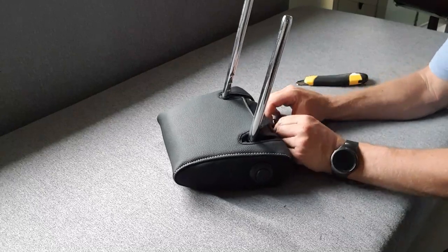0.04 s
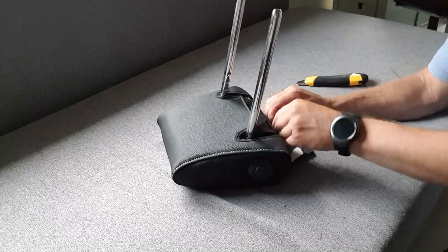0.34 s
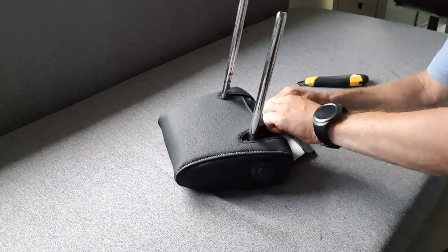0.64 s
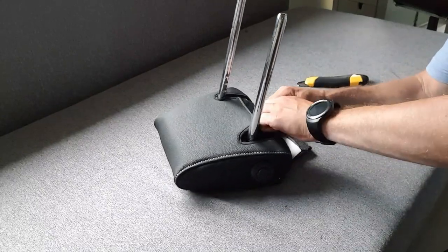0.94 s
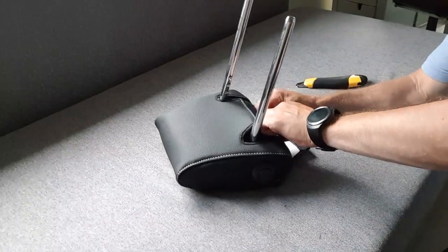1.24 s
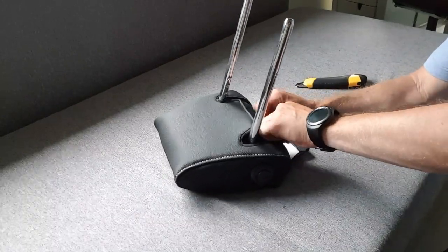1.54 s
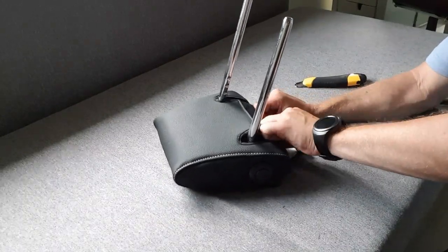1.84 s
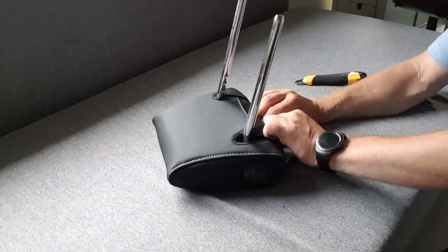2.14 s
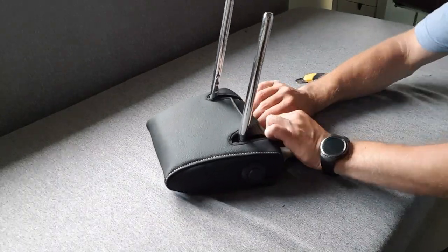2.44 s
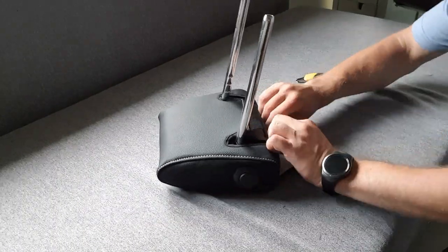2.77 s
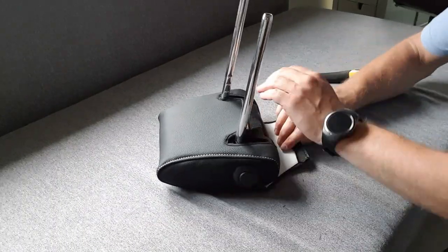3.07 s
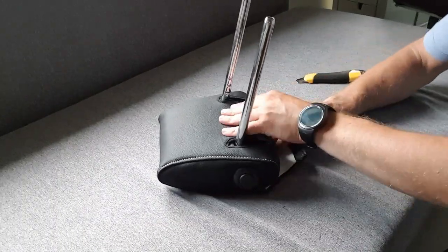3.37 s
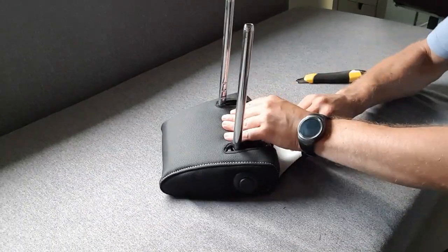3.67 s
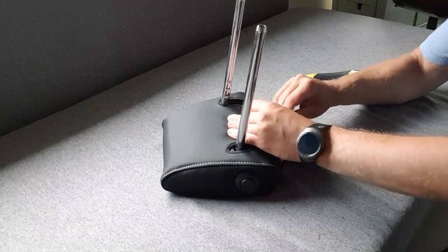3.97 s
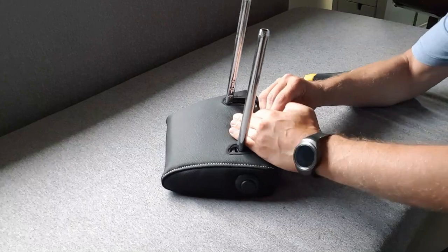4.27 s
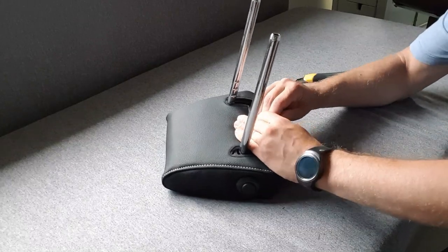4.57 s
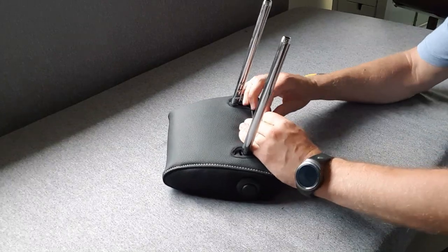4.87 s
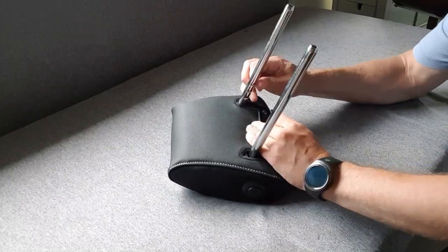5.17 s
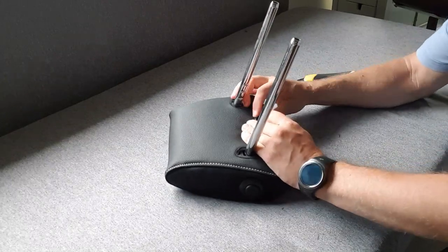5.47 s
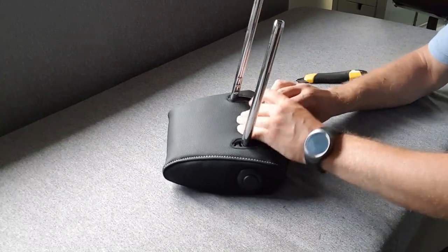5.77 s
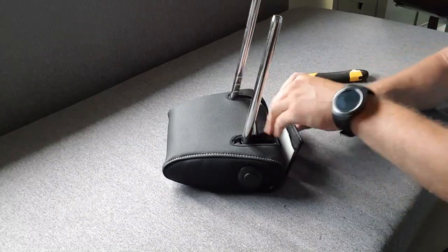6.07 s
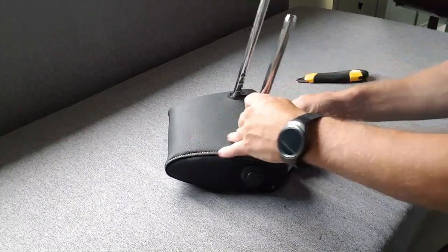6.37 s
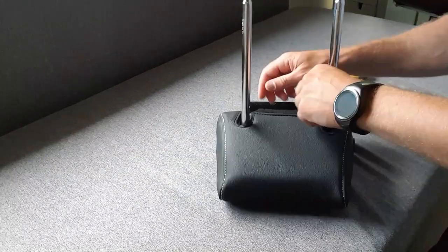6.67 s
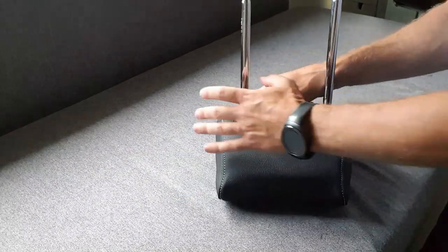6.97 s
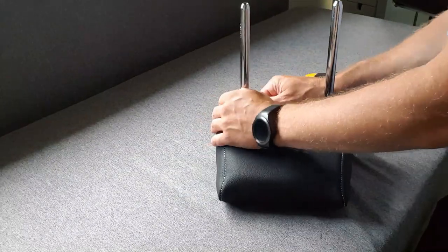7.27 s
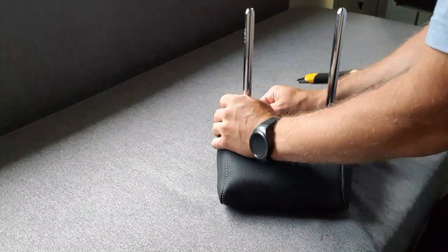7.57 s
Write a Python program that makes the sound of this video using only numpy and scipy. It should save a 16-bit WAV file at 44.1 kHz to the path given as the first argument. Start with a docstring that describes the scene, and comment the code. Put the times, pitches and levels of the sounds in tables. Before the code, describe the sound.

Hands work a fitted cloth cover over a car headrest, close to a stereo microphone in a small room, louder on the left. It opens with short rustles and crisp hem snaps. From about 0.6 to 0.8 seconds a hook-and-loop flap rips open, building to the loudest moment and ending in a hollow pop, with a faint, thin ring from the steel posts. Much quieter, uneven rubbing follows, with tiny ticks and brief creaks of taut cloth. A plastic edge strip clicks near 1.1, 2.7 and 5 seconds, and the padded body bumps dully around 1.2, 5 and 6 seconds. The handling almost stops between 3.1 and 3.6 seconds, then resumes as light, fizzy scrapes. A rub swells around 6.5 seconds, and a few soft strokes and knocks run from 7 to 7.8 seconds. Faint room air, low mains hum and table rumble continue throughout.

```python
"""A fitted cloth cover, pulled tight by two hands over a car headrest, rubs in countless tiny slips.
It lies on a cloth-covered table in a small room, near a stereo microphone and louder on the left.
The stiff hem snaps, taut cloth groans, a plastic edge strip clicks, and early on a hook-and-loop
flap tears open, faintly ringing the steel posts. The padded body bumps dully.
Under it all lie room air, a low mains hum and the rumble of the table."""
import sys
import numpy as np
from scipy import signal
from scipy.fft import rfft, irfft
from scipy.io import wavfile
from scipy.ndimage import uniform_filter1d

SR = 44100
rng = np.random.default_rng(int(sys.argv[2]) if len(sys.argv) > 2 else 0)


def bounce(signal):
    """Save signal as a 16-bit WAV file at the path given by the first command-line argument."""
    frames = np.transpose(np.atleast_2d(signal))
    limited = np.clip(frames, -1, 1)
    pcm = np.round(limited * 32767).astype(np.int16)
    wavfile.write(sys.argv[1], SR, pcm)


N = 344421


def amp(db):
    """Decibels as a gain."""
    return 10 ** (np.asarray(db) / 20)


def unit(x):
    """The signal scaled to an RMS of 1."""
    return x / np.sqrt(np.mean(x ** 2) + 1e-20)


def spectrum_at(points, hz):
    """A spectrum joined by straight lines on a log-frequency axis."""
    f, value = np.transpose(points)
    return np.interp(np.log(hz + 1), np.log(f + 1), value)


def fader(points):
    """Rows of t/s, level/dB as a gain for every sample."""
    times, levels_db = np.transpose(points)
    return amp(np.interp(np.arange(N) / SR, times, levels_db))


def wander(db, per_s):
    """A gain that drifts by about db, reaching a new random value per_s times a second."""
    knots = rng.standard_normal(400)
    return amp(db * np.interp(np.arange(N) / SR * per_s, np.arange(len(knots)), knots))


def add(mix, start_s, sound):
    """Mix a sound in from start_s on."""
    part = mix[max(round(start_s * SR), 0):][:len(sound)]
    part += sound[:len(part)]


def causal_pulse(shape, size=2048):
    """The shortest causal pulse whose spectrum in dB is shape(Hz)."""
    hz = abs(np.fft.fftfreq(size, 1 / SR))
    log_gain = np.log(amp(np.maximum(shape(hz), -90)))
    return np.fft.ifft(np.exp(np.conj(signal.hilbert(log_gain)))).real[:size // 2]


def colour(x, points):
    """Filter by rows of f/Hz, level/dB."""
    return signal.oaconvolve(x, causal_pulse(lambda hz: spectrum_at(points, hz)))[:N]


def resonate(x, hz, width_hz):
    """A resonance of gain 1 at a fixed or moving pitch."""
    turn = np.exp(2j * np.pi * np.cumsum(hz * np.ones(len(x))) / SR)
    pole = np.exp(-np.pi * width_hz / SR)
    return 2 * (turn * signal.lfilter([1 - pole], [1, -pole], x / turn + 1e-18)).real


def slips(per_s, spread_db, clump_db):
    """Tiny slips of uneven size that come in clumps a few milliseconds long."""
    size = amp(spread_db * np.minimum(rng.exponential(1, N), 4)) * rng.choice([-1, 1], N)
    clumps = amp(clump_db * unit(uniform_filter1d(rng.standard_normal(N), 300)))
    return size * clumps * (rng.random(N) < per_s / SR)


def friction(points, per_s, spread_db, clump_db, uneven_db, folds=4):
    """Slips land on several folds of cloth, each with its own colour; the load wanders among them."""
    out, hz = np.zeros(N), np.geomspace(100, 16000, 40)
    knots = np.arange(0, N, SR // 25)
    for _ in range(folds):
        fold_db = spectrum_at(points, hz) + uneven_db * rng.standard_normal(len(hz))
        load = np.interp(np.arange(N), knots, rng.uniform(0.13, 1, len(knots)))
        slipping = slips(per_s / folds, spread_db, clump_db)
        out += load * unit(colour(slipping, np.transpose([hz, fold_db])))
    return unit(out)


# Hand strokes over the cover: t/s, length/s, attack/s, rub level/dB,
# drag/dB re rub, fizz/dB re rub, swell from start to end/dB
STROKES = [(0, 0.08, 0.0026, -57, -3.5, -0.5, -8), (0.141, 0.074, .01, -56, -9, 0, 0),
           (0.242, .04, 0.009, -61.5, -6.5, 2, -2), (.3, 0.025, 0.013, -48.5, -8, 5.5, -3.5),
           (0.323, 0.17, .01, -67.5, -4.5, 2.5, 7), (0.515, 0.088, 0.013, -56, -5.5, 0, -13),
           (.595, .17, .02, -56.5, 2, 10.5, 5), (0.863, 0.33, .03, -80, 8, 6.5, -5),
           (1.091, 0.083, 0.018, -56, -4, -6.5, 7), (1.174, 0.1, 0.0082, -55, -2.5, 0, -10),
           (1.397, .09, .015, -77, -11, 8.5, 0), (1.49, 0.1, 0.023, -63, -5.5, -4.5, -6),
           (1.655, 0.25, 0.052, -73, 8.5, 3.5, -3.5), (1.933, 0.07, 0.024, -66, 1, -2, 9.5),
           (2.009, 0.25, 0.012, -70, -2, 4.5, 0), (2.254, 0.12, 0.06, -54.5, -3.5, -8.5, -5),
           (2.405, .11, 0.028, -56, -9.5, -5.5, -9), (2.524, .15, .01, -74.5, -8, 3, 9),
           (2.695, 0.072, 0.019, -57.5, -9, -4, -7), (2.852, .05, 0.035, -55.5, -7.5, -0.5, -1),
           (2.994, 0.085, 0.011, -68.5, 2, -2.5, -5), (3.58, .15, 0.043, -66, -5.5, 0.5, 2),
           (3.775, 0.089, .008, -74.5, 3.5, 9.5, -7), (3.878, 0.082, 0.038, -72, 2, 14.5, -1),
           (4.018, 0.082, 0.048, -67.5, 3, 5, -5), (4.13, 0.21, .03, -88.5, 14, 13, 0),
           (4.309, 0.15, 0.019, -76.5, 6, 4, -10), (4.554, 0.04, 0.016, -82, 17, -9, -6),
           (4.69, 0.068, 0.011, -81.5, 0, 18.5, -1), (4.749, 0.077, 0.019, -61, 1, -2.5, 2.5),
           (4.982, 0.067, 0.026, -60.5, -22, 3, 0), (5.062, .08, 0.019, -65, -24, -5, -8),
           (5.159, 0.052, 0.0099, -55, 1, -3.5, -5), (5.225, 0.088, 0.018, -73.5, 11.5, 5.5, -2),
           (5.521, 0.19, .025, -70.5, -6, -1.5, 5), (5.736, 0.079, 0.0068, -55, -5.5, -2, -9),
           (5.82, .1, .02, -71, 0, 2, 2), (5.972, 0.09, .01, -65, 0.5, -1, -2),
           (6.303, 0.081, .01, -90.5, 11, 5, 0), (6.405, 0.25, 0.015, -68.5, 1.5, -5, 15),
           (6.548, 0.1, 0.047, -54.5, -9.5, -2.5, -10), (6.731, 0.087, .008, -65, -4.5, -1, -17.5),
           (7.184, 0.16, 0.0079, -71, -3.5, 1, -10.5), (7.318, 0.047, 0.048, -57.5, -3, 5.5, -1),
           (7.501, 0.18, 0.013, -69, 0.5, 5, 1), (7.676, 0.12, .02, -77, 8.5, 6, 5)]


def stroking(grip_db=-91, release_s=0.022):
    """Gains of rub, drag and fizz: strokes take hold, swell or ease, and let go over a restless grip."""
    t = np.arange(N) / SR
    grip = amp(grip_db + np.array([[0], [13], [2]]))  # rub, drag, fizz
    power = (grip * wander(db=4.5, per_s=6)) ** 2
    for start_s, length_s, attack_s, db, drag_db, fizz_db, swell_db in STROKES:
        age = t[:int((length_s + release_s) * SR)]
        gate = np.minimum(age / attack_s, 1) * np.clip(1 - (age - length_s) / release_s, 0, 1)
        stroke = gate * amp(db + swell_db * (np.minimum(age / length_s, 1) - 0.5))
        for layer, layer_db in zip(power, (0, drag_db, fizz_db)):
            add(layer, start_s, (amp(layer_db) * stroke) ** 2)
    return np.sqrt(power)


# Spectra of the sliding cloth, right at the cover: f/Hz, level/dB
DRAG_COLOUR = [(50, -20.5), (140, -0.5), (250, 1), (420, -4), (700, -14), (2000, -72.5)]
RUB_COLOUR = [(200, -30), (450, -4), (650, 0), (1000, -1), (1900, -3), (3000, -13), (6000, -32),
              (12000, -60)]
SOFT_FIZZ_COLOUR = [(800, -30), (1700, 0), (2900, -1), (5000, -4), (7000, -8), (10000, -19), (16000, -20)]
BRIGHT_FIZZ_COLOUR = [(800, -13), (1900, -26.5), (2900, 2.5), (5000, 6), (7000, 2), (10000, -7),
                      (16000, -2.5)]


def cloth_rubbing(sharp_midpoint_db=-2.0, sharp_span_db=7.0):
    """Cloth slides on the padding: a low drag, a mid rub and the fizz of single fibres."""
    rub_gain, drag_gain, fizz_gain = stroking()
    drag = friction(DRAG_COLOUR, per_s=900, spread_db=3, clump_db=1.5, uneven_db=5)
    rub = friction(RUB_COLOUR, per_s=3000, spread_db=2, clump_db=3.5, uneven_db=0.4)
    soft = friction(SOFT_FIZZ_COLOUR, per_s=7000, spread_db=5, clump_db=2.7, uneven_db=1.5)
    bright = friction(BRIGHT_FIZZ_COLOUR, per_s=4000, spread_db=3.5, clump_db=1, uneven_db=2.5)
    crackle = friction(BRIGHT_FIZZ_COLOUR, per_s=220, spread_db=4, clump_db=1, uneven_db=4)
    # a flat palm gives a dull fizz; a nail or an edge a bright one, with single fibres catching
    fizz_re_rub_db = 20 * np.log10(fizz_gain / rub_gain)
    sharp = 0.5 + 0.5 * np.tanh((fizz_re_rub_db - sharp_midpoint_db) / sharp_span_db)
    fizz = np.sqrt(1 - sharp) * soft + np.sqrt(sharp) * (bright + amp(-5) * crackle)
    return amp(1.5) * drag_gain * drag + amp(-0.62) * rub_gain * rub + amp(-1.2) * fizz_gain * fizz


# Hollow modes of the headrest's shell: f/Hz, width/Hz, level/dB
SHELL_MODES = [(573, 23, 6.5), (840, 240, -13.5), (1140, 14, -12), (2350, 16, -46)]


def shell_ringing(cloth):
    """The cloth's sounds excite the hollow of the padded shell."""
    return sum(amp(db) * resonate(cloth, hz, width_hz) for hz, width_hz, db in SHELL_MODES)


# Likeness of the background at the two sides of the microphone: f/Hz, correlation/ratio
NOISE_LIKENESS = [(50, 0.95), (200, 0.016), (1000, 0), (4000, .1), (16000, 0.71)]


def stereo_noise(points):
    """Coloured noise, alike left and right in the deep bass and top treble, unrelated between."""
    hz = np.fft.rfftfreq(N, 1 / SR)
    left, other = rfft(rng.standard_normal((2, N)))
    same = spectrum_at(NOISE_LIKENESS, hz)
    right = same * left + np.sqrt(1 - same ** 2) * other
    return unit(irfft(np.array([left, right]) * amp(spectrum_at(points, hz)), N))


# Steady room air and hiss at the microphone: f/Hz, level/dB
AIR_COLOUR = [(20, -48.5), (35, -14.5), (52, 13.5), (70, 4.5), (100, 5), (135, -6.5), (200, -14),
              (400, -16.5), (800, -34), (2000, -27.5), (4000, -21), (6500, -26), (8500, -40), (11000, -22),
              (14000, -21), (16000, -22)]
# Slow course of the table's rumble under the arms: t/s, level/dB
RUMBLE_LEVEL = [(0, -57), (.12, -51.5), (.35, -64), (.78, -51.5), (.95, -65), (1.12, -53), (1.4, -65.5),
                (2.1, -58), (2.65, -68), (3.1, -60.5), (3.7, -66.5), (4.599, -65), (5.201, -66),
                (5.85, -63.5), (6.15, -68), (6.82, -57), (7.2, -65), (7.81, -68)]


def room_tone(hum_hz=99.2):
    """Room air and microphone hiss, a mains hum, and the table rumbling under the arms."""
    hum = np.sqrt(2) * np.sin(2 * np.pi * hum_hz * np.arange(N) / SR)
    low_noise = stereo_noise([(20, -39), (32, -10), (46, -7), (60, 0.5), (78, -9), (105, -12),
                              (160, -19), (400, -81)])
    rumble = fader(RUMBLE_LEVEL) * wander(db=0.5, per_s=6.5) * low_noise
    air = stereo_noise(AIR_COLOUR)
    return (amp(-68) * air + amp(-69) * hum + rumble) * amp([[3], [-5]])  # left, right


def hem_ticks(per_s=14, octaves=2.7, flutter_s=0.002, ring_hz=5200):
    """The hem ticks faintly at random moments within the strokes; returns rows like those of SNAPS."""
    wait, size, pitch = rng.random((200, 3)).T
    times = np.cumsum(-np.log(1 - wait)) / per_s
    levels_db = -63 + 0.5 * (1 - 2 * size)
    centres_hz = 3300 * 2 ** (2 * pitch - 1)
    return [(s, db, hz, octaves, flutter_s, ring_hz) for s, db, hz in zip(times, levels_db, centres_hz)
            if any(0 < s - start_s < length_s for start_s, length_s, *_ in STROKES)]


# Hem, fingernails and fastener hooks letting go:
# t/s, level/dB, centre f/Hz, spread/octaves, flutter decay/s, ring of the fold f/Hz
SNAPS = [(0.0432, -51.5, 850, 2.3, 0.0019, 4000), (0.099, -52, 1130, 1.6, .0015, 6400),
         (0.1561, -49.5, 770, 1.4, .0039, 5600), (0.2066, -55, 700, 1.7, 0.0018, 1800),
         (0.2566, -43, 2640, 1.7, 0.0012, 5830), (.2627, -50, 3500, 1.9, 0.0012, 3950),
         (0.295, -43.5, 2650, 2.1, 0.0016, 2860), (0.2996, -43.5, 2650, 1.3, .0006, 3000),
         (0.311, -39, 2120, 0.57, 0.00082, 5630), (.3227, -44, 2670, 1.9, 0.0031, 5540),
         (0.4049, -46, 1650, 1.1, 0.0011, 2500), (.4345, -44.5, 2630, 2.4, 0.002, 5540),
         (.5224, -47, 1650, 2.7, .0026, 6600), (0.5327, -42, 2900, 2.8, 0.0013, 7000),
         (0.5823, -39, 1400, 1.9, 0.00094, 1860), (0.5974, -36.5, 5100, 2.1, 0.0014, 6300),
         (0.6135, -35.5, 2880, 2.4, 0.0028, 3500), (0.6383, -31.5, 1100, 2.3, .0014, 1700),
         (.6534, -35, 2000, 2.3, .0039, 3700), (.6652, -31.5, 690, 1.38, 0.0012, 5200),
         (.708, -30, 1000, 2.6, .0077, 1900), (0.7363, -24.5, 1800, 1.9, 0.0092, 6260),
         (0.7411, -25.5, 2180, 1.02, 0.0068, 6200), (0.7546, -23, 1000, 2, 0.0067, 6600),
         (0.7578, -32, 700, 1.8, 0.0017, 5900), (.9535, -53.5, 3200, 1.2, 0.002, 2500),
         (1.1001, -47, 1500, 1.77, 0.0023, 4900), (1.429, -62.5, 2000, 1.2, 0.0018, 5900),
         (1.5318, -55.5, 1100, 1.57, 0.001, 1640), (1.7622, -55.5, 1810, 2.8, 0.0063, 4830),
         (1.815, -60, 1654, 2.1, 0.001, 5200), (1.8774, -56, 1800, 2.8, .0017, 1596),
         (1.9394, -56.5, 1000, 0.72, .003, 1150), (2.0425, -51.5, 4500, 0.72, 0.00047, 5200),
         (2.0572, -53.5, 3600, 1.1, 0.0013, 5200), (2.129, -53.5, 4250, 1.9, .0013, 5900),
         (2.5262, -50.5, 3620, 1.3, 0.0012, 5060), (2.543, -51.5, 3500, 2.5, .001, 5000),
         (2.6374, -52.5, 3880, 1.5, 0.00093, 5000), (2.6962, -39, 2610, 2.5, 0.0015, 4800),
         (2.777, -47, 1100, 2.1, 0.0015, 1710), (3.202, -65.5, 800, 1.8, .002, 950),
         (3.6519, -54, 1130, 1.2, .0017, 2000), (3.782, -51, 2400, 1.17, .0018, 5000),
         (3.8433, -55, 9000, 1.8, .0007, 6750), (4.053, -57, 2470, 2.5, 0.0012, 3900),
         (4.2813, -46, 9930, 2.3, .0007, 10500), (4.393, -63, 1200, 1.6, 0.0016, 4870),
         (4.762, -51, 697, 1.97, .0013, 5000), (4.7961, -45, 3150, 1.12, 0.0022, 4850),
         (4.997, -39, 2000, 3.3, 0.0012, 5440), (5.0387, -44.5, 1650, 1.3, 0.0014, 3200),
         (5.1657, -48, 930, 2.3, 0.0043, 5500), (5.2746, -53.5, 756, 2.1, 0.0039, 1160),
         (5.5546, -56.5, 1250, 1.25, 0.0016, 1700), (5.6551, -57, 2600, 1.4, .0054, 3210),
         (5.752, -49, 930, 2.1, 0.00078, 1010), (5.9385, -57.5, 4720, 1.2, 0.0029, 6200),
         (5.97, -44, 797, 2.6, 0.0015, 4150), (6.014, -52.5, 1500, 2.4, 0.0022, 5200),
         (6.0332, -47, 3200, 1.9, 0.0016, 7200), (6.3216, -63, 4250, 1.36, 0.0016, 6900),
         (6.651, -54, 840, 1.03, .0016, 2000), (7.5229, -54.5, 2170, 0.81, 0.0031, 5800),
         (7.5772, -50.5, 700, 1.35, .0025, 1600), (7.6274, -43, 704, 2, 0.0014, 785),
         (7.7564, -56, 3220, 0.43, 0.00052, 3700)]


def snapping(release=3.0, ring_db=-3, ring_cycles=1.22, gain_db=1.0):
    """Each snap is a release and a brief flutter of slips; the taut fold rings for a cycle or two."""
    out, t = np.zeros(N), np.arange(512) / SR
    events = SNAPS + hem_ticks()
    noises = rng.standard_normal((300, len(t)))
    for (start_s, db, centre_hz, octaves, flutter_s, ring_hz), noise in zip(events, noises):
        flutter = release * (t == 0) + noise * np.exp(-t / flutter_s)
        pulse = causal_pulse(lambda hz: -10 / np.log(10) * (np.log2((hz + 1) / centre_hz) / octaves) ** 2)
        crack = unit(np.convolve(flutter, pulse))
        fold = np.cos(2 * np.pi * ring_hz * t) * np.exp(-t * ring_hz / ring_cycles)
        snap = crack + amp(ring_db) * unit(np.convolve(crack, fold)[:len(crack)])
        snap *= np.sqrt(0.004 * SR) / np.linalg.norm(snap)  # the energy of 4 ms at an RMS of 1
        add(out, start_s, amp(db + gain_db) * snap)
    return out


# Bumps on the padded body and hollow pops of the taut cover: t/s, level/dB, f/Hz
BUMPS = [(.164, -47, 186), (.666, -35, 533), (.757, -18.5, 574), (.762, -31, 213), (1.101, -36, 600),
         (1.186, -36.5, 544), (1.25, -37.5, 957), (2.003, -47, 229), (2.647, -46, 576), (3.619, -48.5, 227),
         (3.649, -47, 188), (3.687, -43, 230), (3.781, -47, 280), (4.334, -47.5, 458), (4.762, -41.5, 485),
         (4.996, -33, 1080), (5.038, -35, 1520), (5.166, -45, 188), (5.199, -52, 210), (5.741, -42.5, 564),
         (5.79, -42, 567), (5.97, -33.5, 544), (6.02, -40.5, 473), (6.43, -43, 254), (6.812, -49.5, 235),
         (7.066, -42.5, 585), (7.627, -41, 550), (7.715, -44.5, 575)]


def body_bumping(overtone_ratio=1.506, overtone_db=-8, rise_s=0.00093):
    """A knuckle, a palm or a released fold sets the padded body swinging for a few cycles."""
    out, t = np.zeros(N), np.arange(SR // 5) / SR
    for start_s, db, hz in BUMPS:
        t60_s = 0.033 * (hz / 550) ** -0.67  # higher swings die sooner
        phase = 2 * np.pi * hz * t
        swing = np.sin(phase) + amp(overtone_db) * np.sin(overtone_ratio * phase)
        envelope = amp(-60 * t / t60_s) * (1 - np.exp(-t / rise_s))
        add(out, start_s, amp(db) * swing * envelope)
    return out


# Course of the tear along the flap: t/s, level/dB
PEEL_LEVEL = [(.58, -61), (.622, -41.5), (.672, -38.5), (.688, -45), (.712, -31), (.728, -57), (.741, -25),
              (0.763, -27.5), (.79, -73)]
# Spectrum of the tearing hooks, right at the flap: f/Hz, level/dB
PEEL_COLOUR = [(60, -48), (200, 8.5), (400, -17), (600, -3), (1000, 9.5), (1900, 5.5), (3000, -3),
               (5000, -1), (6500, -5), (10000, -4), (16000, 0.5)]


def flap_peeling():
    """Hooks tear from their loops in ragged rows, harder and harder until the flap comes free."""
    hooks = friction(PEEL_COLOUR, per_s=2200, spread_db=3.6, clump_db=3.4, uneven_db=1.2)
    return amp(-1.5) * fader(PEEL_LEVEL) * hooks


# Modes of the headrest's steel posts: f/Hz, width/Hz, level/dB
POST_MODES = [(4557, 10, 3), (6023, 9, 13), (6497, 12, 1), (8298, 8, 12)]


def posts_ringing(tear):
    """Only the hard tug on the flap shakes the steel posts into a thin, high ring."""
    return sum(amp(db) * resonate(tear, hz, width_hz) for hz, width_hz, db in POST_MODES)


# Groans and rasps of the taut cover, and two low, dull thumps:
# t/s, length/s, level/dB, start f/Hz, end f/Hz, width/Hz
GROANS = [(0.758, .04, -48, 247, 218, 130), (2.302, 0.076, -58.5, 800, 771, 450),
          (3.001, 0.14, -66, 615, 750, 200), (3.704, 0.033, -57.5, 1080, 860, 260),
          (3.886, 0.054, -55.5, 260, 345, 80), (4.056, 0.057, -62.5, 895, 1040, 300),
          (4.35, 0.098, -67, 500, 600, 159), (5.16, 0.039, -51, 191, 162, 159),
          (6.57, 0.07, -60, 1500, 1790, 700), (7.282, 0.11, -59, 1660, 2340, 913)]


def cloth_groaning():
    """Rough noise drives a gliding resonance: taut cloth groans or rasps, and the lowest bursts thump."""
    out = np.zeros(N)
    for start_s, length_s, db, start_hz, end_hz, width_hz in GROANS:
        hz = np.linspace(start_hz, end_hz, int(length_s * SR))
        roughness = rng.standard_normal(SR)[:len(hz)]
        groan = unit(resonate(resonate(roughness, hz, width_hz), hz, 2 * width_hz))
        add(out, start_s, amp(db) * groan * signal.windows.tukey(len(hz), 0.5))
    return out


# Modes of the cover's plastic edge strip: f/Hz, level/dB, T60/s
STRIP_MODES = [(3080, 0, 0.015), (3620, 0, 0.018), (4360, 0, 0.014), (5300, -1, .014), (6300, -9, .012)]
# The strip catching or springing loose: t/s, level/dB
STRIP_CLICKS = [(1.1008, -39), (2.0445, -56), (2.696, -44.5), (4.9972, -43), (5.038, -54)]


def strip_clicking(rise_s=0.00037):
    """The plastic strip is flicked and its few modes die within milliseconds."""
    out, t = np.zeros(N), np.arange(SR // 20) / SR
    ring = sum(amp(db - 60 * t / t60_s) * np.sin(2 * np.pi * hz * t) for hz, db, t60_s in STRIP_MODES)
    for start_s, db in STRIP_CLICKS:
        add(out, start_s, amp(db) * ring * (1 - np.exp(-t / rise_s)))
    return out


# Decay of the small room around the table: f/Hz, T60/s
ROOM_T60 = [(100, 0.21), (500, 0.21), (1400, 0.24), (4000, 0.26), (10000, 0.24), (16000, 0.24)]


def room_tail(build_s=0.0044):
    """A pair of diffuse tails, alike mainly in the bass, each band dying at its own speed."""
    reflections = rng.standard_normal((2, SR // 2)) * (rng.random((2, SR // 2)) < 0.15)
    hz, t, bands = signal.stft(reflections, SR, nperseg=256)
    same = spectrum_at([(300, 0.99), (1000, 0), (2500, 0), (6000, 0.28)], hz)[:, None]
    bands[1] = same * bands[0] + np.sqrt(1 - same ** 2) * bands[1]
    envelope = amp(-60 * t / spectrum_at(ROOM_T60, hz)[:, None]) * (1 - np.exp(-t / build_s))
    tail = signal.istft(bands * envelope, SR, nperseg=256)[1]
    return tail / np.linalg.norm(tail[0])


def small_room(x, echo_db=-10, echo_s=0.0061, tails=3):
    """Direct sound and one near reflection favour the microphone's left side; a short tail follows."""
    # an 11 Hz crossfade among several tails keeps the reverberation smooth, without ringing pitches
    turn = 2 * np.pi * 11 * np.arange(N) / SR
    shares = [np.sqrt(2 / tails) * np.cos(turn + np.pi * k / tails) for k in range(tails)]
    reverb = sum(signal.oaconvolve((x * share)[None], room_tail(), axes=1)[:, :N] for share in shares)
    left = x + amp(echo_db) * np.pad(x, (round(echo_s * SR), 0))[:N]
    shaded = colour(x, [(100, -11), (600, -9), (2000, -12.5), (6000, -12), (14000, -10.5)])
    right = np.roll(shaded, 2)  # arrives two samples later
    return amp(2.5) * (np.array([left, right]) + reverb * amp([[-4], [-9]]))


# Response of the microphone: f/Hz, level/dB
MIC_RESPONSE = [(100, -3.5), (5000, -0.5), (6600, 2), (7800, -4), (9000, -4.5), (11000, 3.5), (14000, 1.5),
                (16000, -9.5)]
# Where the hands work, as the gain on the microphone's right side: t/s, level/dB
HAND_PLACE = [(0, -0.5), (.45, -0.5), (.62, 2.5), (.85, 0), (1.6, 0.5), (2.1, -1), (2.8, 0), (4.4, -0.5),
              (5.2, .5), (5.8, -0.5), (6.5, .5), (7.3, 0.5)]


def scene():
    """Cover and headrest as heard at the stereo microphone, over the tone of the room."""
    tear = flap_peeling()
    cloth = cloth_rubbing() + tear + snapping()
    headrest = cloth + shell_ringing(cloth) + body_bumping() + cloth_groaning() + strip_clicking()
    left, right = small_room(colour(headrest, MIC_RESPONSE))
    posts = colour(posts_ringing(tear), MIC_RESPONSE) * amp([[4], [-2]])  # left, right
    return np.array([left, right * fader(HAND_PLACE)]) + posts + room_tone()


def record(dry, edge_hz=16100):
    """The recorder's band limit: a steep low-pass."""
    low_pass = signal.firwin(511, edge_hz, window=("kaiser", 9), fs=SR)
    return signal.oaconvolve(dry, low_pass[None], "same")


dry = scene()
out = record(dry)
bounce(out)
```